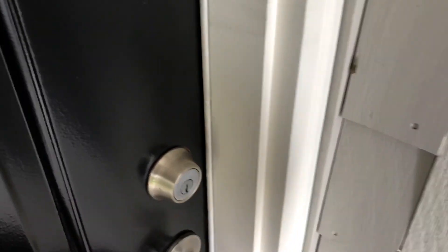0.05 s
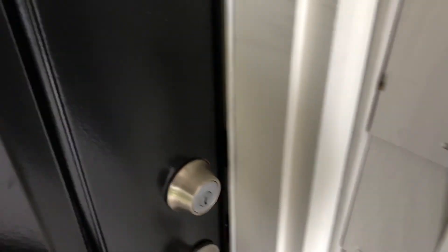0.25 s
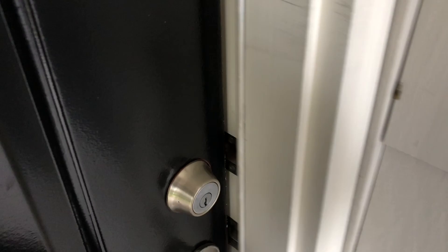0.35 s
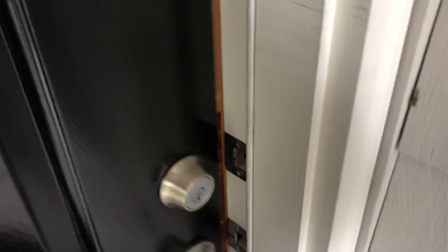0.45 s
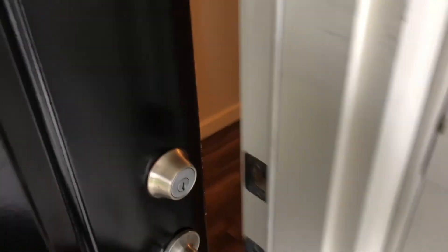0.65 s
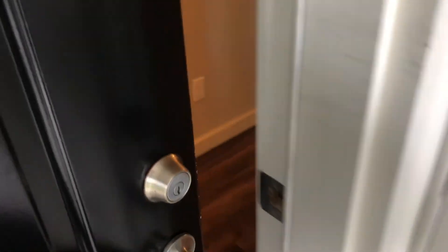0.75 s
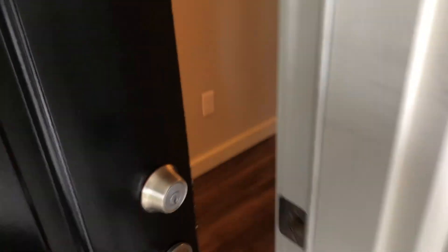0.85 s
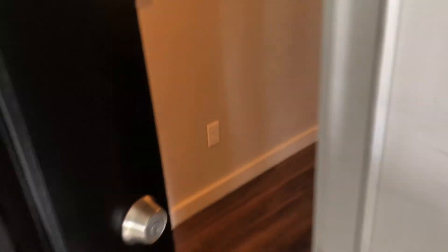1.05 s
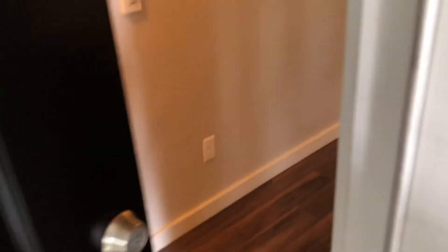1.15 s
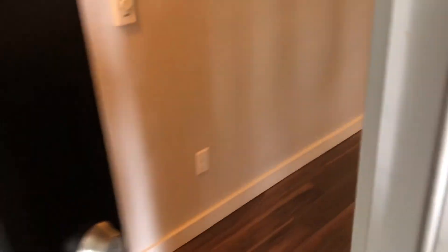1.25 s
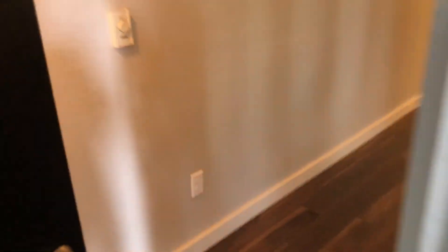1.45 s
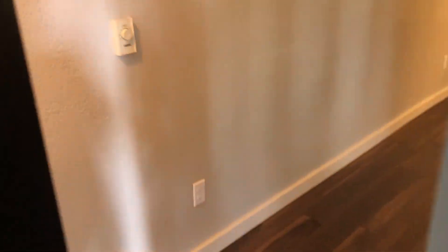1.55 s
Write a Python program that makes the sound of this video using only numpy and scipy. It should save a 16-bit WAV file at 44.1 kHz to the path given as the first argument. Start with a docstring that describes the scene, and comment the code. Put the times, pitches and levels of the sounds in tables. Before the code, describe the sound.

A door opens: the handle clunks, the latch scrapes and snaps free with a wooden thump, then a dry hinge gives a high, slightly falling squeak. It is heard up close, echoing briefly into an empty room.

```python
"""On the doorstep of an empty apartment, the entrance door is unlatched and pushed open.
The handle clunks, the bolt scrapes back and snaps free of the strike plate, and the wooden leaf
booms in its bending modes. The seal brushes along while a dry hinge sticks and slips in a falling
squeak. The doorway and the bare room echo over a low outdoor rumble and a far-off drone."""
import sys
import numpy as np
from scipy import signal
from scipy.fft import rfft, irfft
from scipy.io import wavfile

SR = 44100
rng = np.random.default_rng(int(sys.argv[2]) if len(sys.argv) > 2 else 0)


def unload_wav(signal):
    """Save mono or channel-first audio to the path in sys.argv[1] as 16-bit WAV at rate SR, clipped to [-1, 1]."""
    wavfile.write(
        sys.argv[1],
        SR,
        np.round(np.clip(np.atleast_2d(signal).T, -1, 1) * 32767).astype(np.int16),
    )


N = 70560
TIME = np.arange(N) / SR


# The bolt hits the plate in quick succession. Each row: start in seconds, relative level in dB.
BOLT_HITS = [(.338, -2), (0.3394, 0.5), (0.341, -13.5)]
# The bright crack of a hit. Each row: frequency in Hz, relative level in dB.
CRACK_SPECTRUM = [(300, -27), (750, -18), (1500, -3), (2500, -4), (3400, -7.5), (6000, -12.5), (7350, -3.5),
                  (8000, -18), (9000, 7), (11000, -6), (12500, -6), (16000, -20)]

def bolt_snap():
    """The bolt springs free: hard cracks, with a short rattle and ringing steel on the loudest."""
    cracks = sum(amp(db) * decay(start, t60=0.011) * noise(CRACK_SPECTRUM) for start, db in BOLT_HITS)
    loudest_s = BOLT_HITS[1][0]
    rattle = amp(-12) * decay(loudest_s, t60=0.049) * noise(CRACK_SPECTRUM)
    return amp(-12.5) * (cracks + rattle) + amp(-25.5) * steel_ring(loudest_s, modes=len(STEEL_MODES))


# The ring of bolt and plate. Each row: frequency in Hz, relative level in dB, t60 in seconds.
STEEL_MODES = [(1120, -9, .07), (1410, -9, .11), (1950, -10, .05), (3460, 3, .026), (4510, -7, .022),
               (5385, -4, .027), (6690, -16, .04), (7340, -2, .033), (8950, 1, .016), (9800, -5, .022),
               (10750, -7, .04), (11360, -8, .04)]

def steel_ring(start, modes):
    """Struck steel rings in as many of its modes as asked, from the lowest up, blurred in phase by the loose
    bolt."""
    return sum(amp(db) * ring(start, hz, t60, blur=0.97 * wander(hz=156))
               for hz, db, t60 in STEEL_MODES[:modes])


def leaf_thump():
    """Bending waves cross the wooden leaf, the high ones arriving first: one fast-falling pulse."""
    start, first_hz, last_hz, fall_s = 0.3435, 466, 125, 0.0039
    age = np.maximum(TIME - start, 0)
    cycles = last_hz * age + (first_hz - last_hz) * fall_s * (1 - np.exp(-age / fall_s))
    return -amp(-24) * decay(start, t60=0.053, rise=0.00099) * np.sin(2 * np.pi * cycles)


# The body of the door. Each row: frequency in Hz, relative level in dB, t60 and attack in seconds.
LEAF_MODES = [(72, -7.5, 0.14, 0.045), (155.2, -0.5, 0.22, 0.014), (265.2, -8.5, 0.21, 0.012),
              (403, -17.5, 0.14, 0.0072), (819, -13.5, 0.11, 0.0026)]
# The rumble of the door as it is gripped and leant on. Each row: time in seconds, level in dB.
LEAN_ENVELOPE = [(0, -42), (.1, -54), (.19, -53.5), (.33, -53.5), (.45, -75)]
# Its bass-heavy tone. Each row: frequency in Hz, relative level in dB.
LEAN_TONE = [(25, -16), (70, 2.5), (200, -6), (500, -25), (2000, -58)]

def leaf_boom():
    """The leaf rumbles under the hand, then swings free in its bending modes, the lowest swelling last."""
    start = 0.3425
    boom = sum(amp(db) * ring(start, hz, t60, rise) for hz, db, t60, rise in LEAF_MODES)
    return amp(-28.5) * boom + amp(curve(LEAN_ENVELOPE)) * noise(LEAN_TONE)


# The sinking pitch of the squeak. Each row: time in seconds, frequency in Hz.
SQUEAK_PITCH = [(.73, 3145), (.765, 3147), (.785, 3062), (.835, 3070), (.885, 2877), (.93, 2890),
                (.965, 2826), (1.0, 2808), (1.08, 2840), (1.15, 2853), (1.18, 2747), (1.23, 2718),
                (1.29, 2773), (1.43, 2708), (1.6, 2774)]
# Its swells. Each row: time in seconds, then levels of fundamental, octave and twelfth in dB.
SQUEAK_LEVELS = [(.72, -75.5, -95.5, -98), (.748, -49.5, -65.5, -85), (.81, -53, -70, -75),
                 (.86, -44, -57.5, -63), (.89, -45.5, -50.5, -71), (.94, -42, -49.5, -66.5),
                 (.965, -40.5, -64, -61), (1.03, -42, -52, -68), (1.085, -38.5, -48, -66),
                 (1.15, -46, -50.5, -70), (1.195, -40, -55, -58.5), (1.255, -41, -52.5, -71),
                 (1.3, -47.5, -62, -79.5), (1.33, -62, -65.5, -89.5), (1.385, -50, -64, -85),
                 (1.43, -52, -68, -82.5), (1.485, -76.5, -70, -83.5), (1.53, -59.5, -77.5, -90),
                 (1.6, -83, -86, -100)]
JITTER_SHARE, JITTER_HZ = 0.0022, 99  # depth and speed of the hinge's pitch wobble

def hinge_squeak():
    """Stick-slip on the hinge pin: a nearly pure tone whose harmonics flicker."""
    pitch = curve(SQUEAK_PITCH) * (1 + JITTER_SHARE * wander(JITTER_HZ))
    phase = 2 * np.pi * np.cumsum(pitch) / SR
    levels = [curve(SQUEAK_LEVELS, column) for column in (1, 2, 3)]
    levels += [levels[-1] - 20.5] * 2  # faint fourth and fifth harmonics
    flicker_db, flicker_hz = 2, 60.06
    return np.sqrt(2) * sum(amp(db + flicker_db * wander(flicker_hz)) * np.sin(harmonic * phase)
                            for harmonic, db in enumerate(levels, 1))


# Faint side squeals. Each row: start and length in seconds, opening pitch in Hz, peak level in dB.
SIDE_SQUEALS = [(1.075, .06, 7610, -66), (1.176, .13, 3570, -66.5), (1.182, .085, 3990, -68),
                (1.391, .12, 3980, -68), (1.39, .17, 3530, -68)]

def hinge_squeals():
    """Weaker modes of the hinge catch briefly and sag in pitch."""
    sag_per_s = 0.2
    out = np.zeros(N)
    for start, length, hz, db in SIDE_SQUEALS:
        age = np.clip(TIME - start, 0, length)
        pitch = hz * (1 - sag_per_s * age + JITTER_SHARE * wander(JITTER_HZ))
        swell = np.sqrt(abs(np.sin(np.pi * age / length)))
        out += amp(db) * swell * np.sin(2 * np.pi * np.cumsum(pitch) / SR)
    return out


# Soft bumps of the handle. Each row: start in seconds, relative level in dB.
HANDLE_BUMPS = [(0.2071, -31), (.247, -38)]

def handle_clunks():
    """The handle takes up its slack and bumps the bolt, ringing only its lowest modes."""
    return sum(amp(db) * steel_ring(start, modes=3) for start, db in HANDLE_BUMPS)


# Sharp ticks of latch and hinge. Each row: start in seconds, level in dB.
HARDWARE_TICKS = [(0.1466, -51), (0.2065, -38.5), (0.786, -52.5), (1.188, -51.5), (1.311, -50.5)]
# Their bright tone. Each row: frequency in Hz, relative level in dB.
TICK_SPECTRUM = [(500, -6.5), (1500, 6), (4500, 9), (7000, 4.5), (10000, 5), (16000, -21.5)]
# Dull knocks of handle and door. Each row: start in seconds, level in dB, centre frequency in Hz.
HARDWARE_KNOCKS = [(.003, -51, 990), (0.205, -34.5, 1300), (0.214, -42, 191), (0.2525, -37, 1910),
                   (0.263, -44, 230), (.787, -50, 1550), (.862, -46.5, 460), (1.038, -44, 320),
                   (1.039, -46, 1103), (1.084, -46, 1530), (1.256, -47.5, 1500), (1.311, -51, 4300)]

def hardware_clatter():
    """Loose hardware ticks and knocks in short bursts of noise."""
    out = sum(amp(db) * decay(start, t60=0.026) * noise(TICK_SPECTRUM) for start, db in HARDWARE_TICKS)
    spread = 2 ** 0.46  # just under half an octave either side
    for start, db, hz in HARDWARE_KNOCKS:
        hump = [(hz / 8, -22), (hz / spread, -8), (hz, 0), (hz * spread, -9), (hz * 10, -42)]
        out += amp(db) * decay(start, t60=0.052, rise=0.0013) * noise(hump)
    return out


# The bolt sliding back. Each row: time in seconds, level in dB.
SCRAPE_ENVELOPE = [(.17, -54), (.2, -45.5), (.22, -42), (.256, -42), (.285, -47.5), (.31, -49), (.335, -43),
                   (.35, -58.5)]
# Its dark, gritty tone. Each row: frequency in Hz, relative level in dB.
SCRAPE_SPECTRUM = [(100, -2), (190, 6), (700, -9), (960, -9), (2000, -11), (3200, -16.5), (16000, -43.5)]

def bolt_scrape():
    """The bolt drags over its plate in tiny slips of uneven strength."""
    slips_per_s, spread_db = 3000, 3
    slips = (rng.random(N) < slips_per_s / SR) * rng.choice([-1, 1], N)
    strength = amp(spread_db * np.minimum(rng.exponential(1, N), 4))
    return amp(curve(SCRAPE_ENVELOPE)) * colour(slips * strength, SCRAPE_SPECTRUM)


# The swish of the seal. Each row: time in seconds, level in dB.
SEAL_ENVELOPE = [(0, -54), (.1, -78), (.2, -57), (.3, -57.5), (.45, -62), (.6, -55.5), (.66, -63),
                 (.82, -66.5), (.89, -66), (.96, -79), (1.15, -74), (1.21, -68.5), (1.36, -72),
                 (1.51, -60.5), (1.6, -65.5)]
# Its airy tone. Each row: frequency in Hz, relative level in dB.
SEAL_SPECTRUM = [(800, 1.5), (2000, 4), (4000, 4.5), (7000, -3), (11000, -6), (16000, -10)]

def seal_brush():
    """The door seal rubs along with a soft, fluttering hiss."""
    flutter_db = 1.4 * wander(hz=60)
    return amp(curve(SEAL_ENVELOPE) + flutter_db) * noise(SEAL_SPECTRUM)


def doorway_echoes(x):
    """Quick reflections from the frame and porch walls."""
    echoes_per_s = 1500
    taps = (rng.random(N) < echoes_per_s / SR) * rng.standard_normal(N) * decay(0.007, t60=0.14)
    return signal.fftconvolve(x, taps / np.linalg.norm(taps))[:N]


# The reverb time of the empty room. Each row: frequency in Hz, t60 in seconds.
ROOM_T60 = [(100, .35), (400, 0.46), (1500, 1), (3000, 0.77), (6000, .85), (15000, 0.43)]

def room_reverb(x):
    """Bare walls return a dense tail, each band dying at its own speed."""
    hz, seconds, bands = signal.stft(rng.standard_normal(N), SR, nperseg=256)
    fade = np.exp(-np.log(1000) * seconds / at_frequency(ROOM_T60, hz)[:, None])
    tail = signal.istft(bands * fade, SR, nperseg=256)[1][:N]
    tail *= np.minimum(TIME / 0.017, 1)  # soft attack
    return signal.fftconvolve(x, tail / np.linalg.norm(tail))[:N]


# The outdoor bed. Each row: frequency in Hz, relative level in dB.
AIR_SPECTRUM = [(20, -39), (38, -15.5), (72, -2.5), (140, -2.5), (235, -12), (290, -14), (420, -25.5),
                (650, -23.5), (1150, -19.5), (1900, -29.5), (2800, -43), (5500, -37), (16000, -49)]
# A distant drone. Each row: time in seconds, pitch in Hz, level in dB.
FAR_DRONE = [(0, 134.9, -45.5), (.3, 149.9, -64), (.55, 166, -49), (.85, 173, -50.5), (1.1, 166.8, -55),
             (1.3, 147, -48.5), (1.6, 153.8, -57)]

def outdoors():
    """Low rumble, faint hiss and a wavering far-off drone."""
    pitch = curve(FAR_DRONE) + 4.66 * wander(hz=21.1)
    air = amp(-50.5) * noise(AIR_SPECTRUM)
    drone_db = curve(FAR_DRONE, column=2) + 4 * wander(hz=19)
    return air + amp(drone_db) * np.sin(2 * np.pi * np.cumsum(pitch) / SR)


def amp(db):
    """Decibels to gain."""
    return 10 ** (np.asarray(db) / 20)


def unit(x):
    """Scales to an rms of one."""
    return x / np.sqrt(np.mean(x ** 2) + 1e-20)


def curve(rows, column=1):
    """One column of a time table, joined by straight lines."""
    rows = np.array(rows)
    return np.interp(TIME, rows[:, 0], rows[:, column])


def at_frequency(rows, hz):
    """Reads a frequency table, joined by straight lines on a log axis."""
    row_hz, values = np.transpose(rows)
    return np.interp(np.log(hz + 1), np.log(row_hz + 1), values)


def colour(x, spectrum):
    """Equalises x with a curve of (Hz, dB) points, at unit rms."""
    gain = amp(at_frequency(spectrum, np.fft.rfftfreq(N, 1 / SR)))
    return unit(irfft(rfft(x) * gain, N))


def noise(spectrum):
    """Noise of a given colour, at unit rms."""
    return colour(rng.standard_normal(N), spectrum)


def wander(hz):
    """Smooth random motion up to about hz, at unit rms."""
    lowpass = np.exp(-(np.fft.rfftfreq(N, 1 / SR) / hz) ** 2)
    return unit(irfft(rfft(rng.standard_normal(N)) * lowpass, N))


def decay(start, t60, rise=0.00036):
    """A straight attack, then a fall of 60 dB every t60 seconds."""
    age = np.maximum(TIME - start, 0)
    return np.minimum(age / rise, 1) * np.exp(-np.log(1000) * np.maximum(age - rise, 0) / t60)


def ring(start, hz, t60, rise=0.00059, blur=0):
    """One dying mode; blur, in radians, unsettles its phase."""
    return decay(start, t60, rise) * np.sin(2 * np.pi * hz * (TIME - start) + blur)


def shelf(x, hz, db):
    """Raises or lowers the treble above hz."""
    gain_db = at_frequency([(hz * 0.83, 0), (hz, db)], np.fft.rfftfreq(2 * N, 1 / SR))
    return irfft(rfft(x, 2 * N) * amp(gain_db))[:N]


def scene():
    """The latch echoes in the doorway; latch, leaf and hinge ring in the room. Walls dull the top."""
    latch = handle_clunks() + bolt_snap() + hardware_clatter()
    leaf = leaf_thump() + leaf_boom()
    hinge = hinge_squeak() + hinge_squeals()
    direct = latch + leaf + hinge + bolt_scrape() + seal_brush() + outdoors()
    # The squeak's overtones spread into the room more than its fundamental.
    bright_hinge = shelf(hinge, hz=4500, db=3.5)
    room_send = amp(-18) * latch + amp(-10) * leaf + amp(-12.5) * bright_hinge
    echoes = amp(-13) * doorway_echoes(latch) + room_reverb(room_send)
    return (direct + shelf(echoes, hz=8500, db=-11))[None]


def record(dry):
    """A steep low-pass takes off the very top of the treble."""
    cutoff_hz = 16200
    lowpass = signal.firwin(255, cutoff_hz, window=("kaiser", 9), fs=SR)
    return signal.oaconvolve(dry, lowpass[None], "same")


dry = scene()
out = record(dry)
unload_wav(out)
```